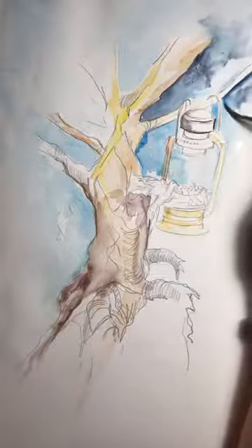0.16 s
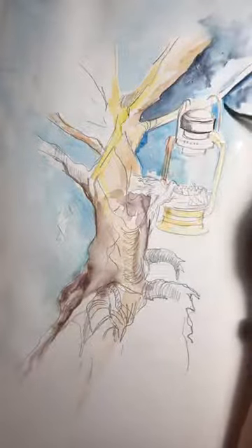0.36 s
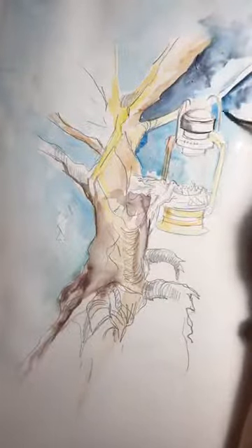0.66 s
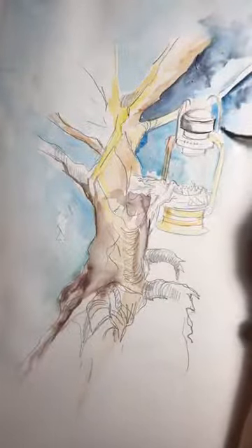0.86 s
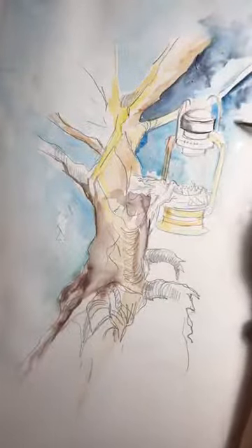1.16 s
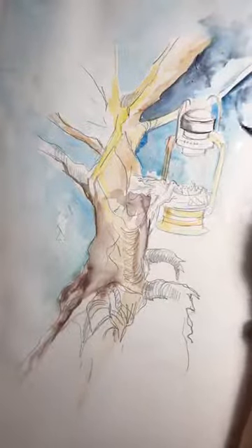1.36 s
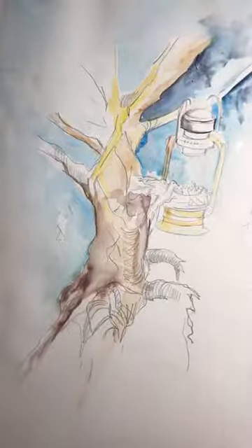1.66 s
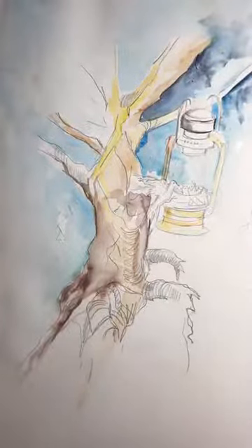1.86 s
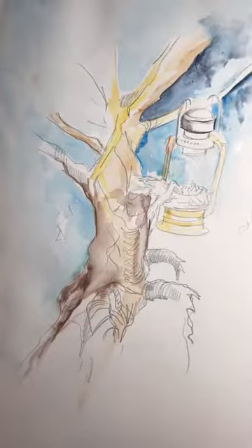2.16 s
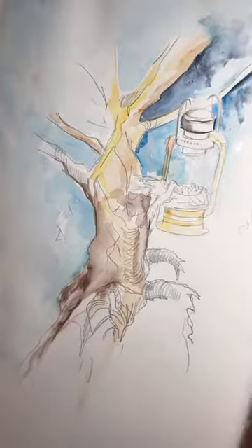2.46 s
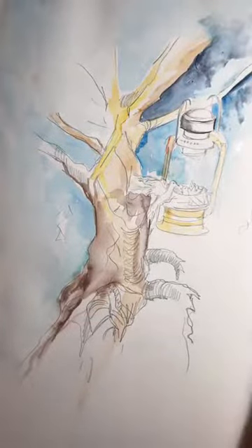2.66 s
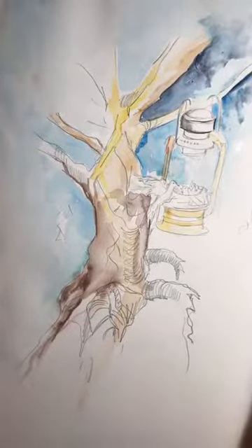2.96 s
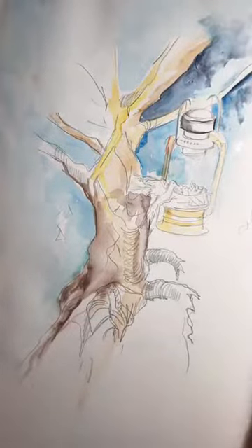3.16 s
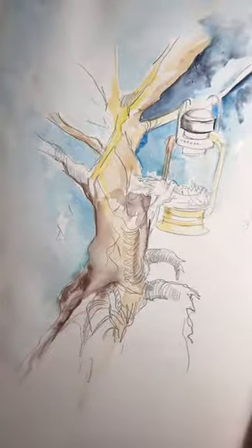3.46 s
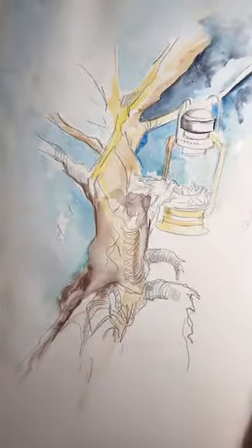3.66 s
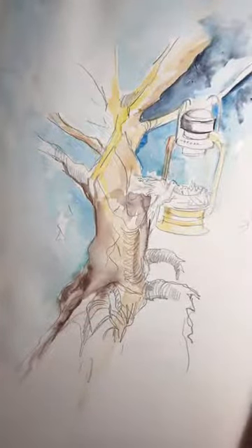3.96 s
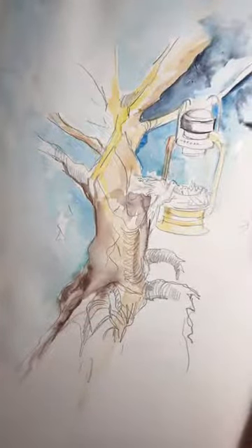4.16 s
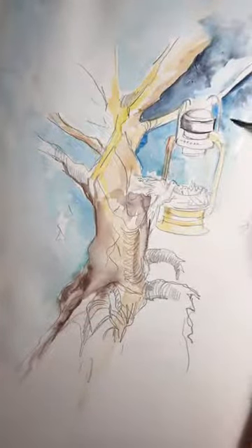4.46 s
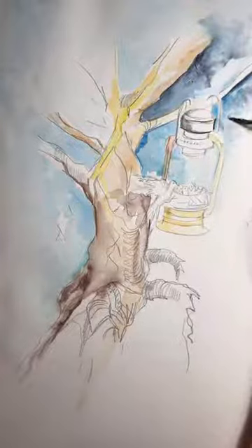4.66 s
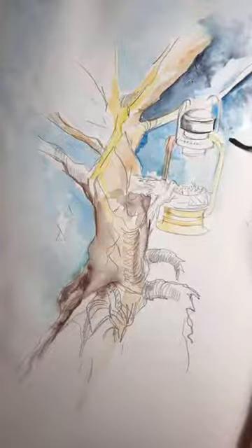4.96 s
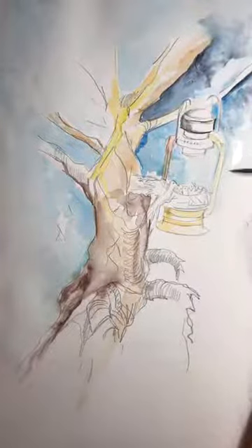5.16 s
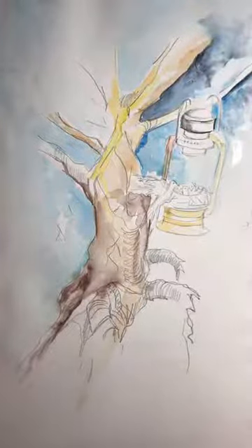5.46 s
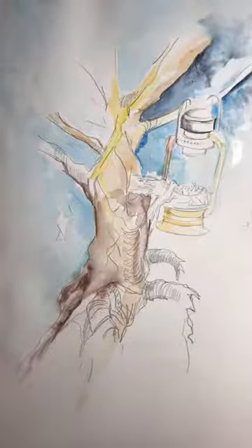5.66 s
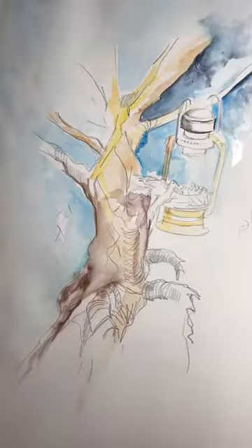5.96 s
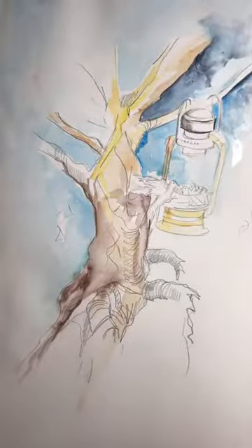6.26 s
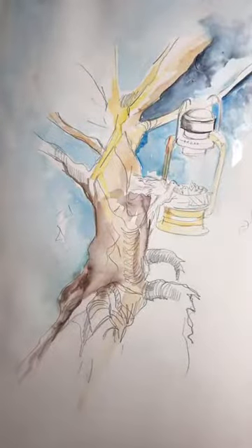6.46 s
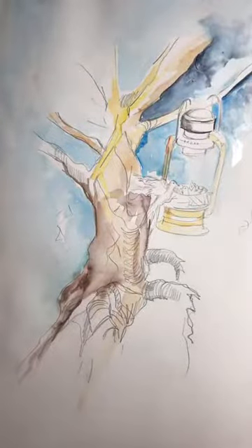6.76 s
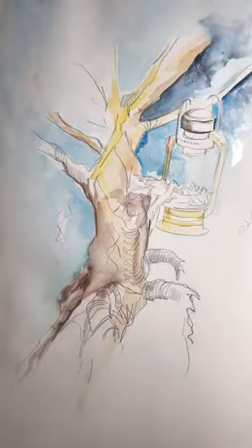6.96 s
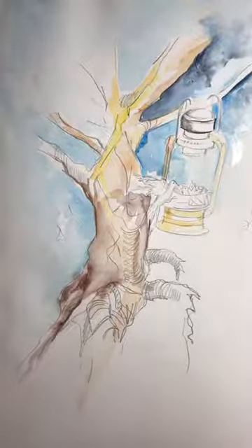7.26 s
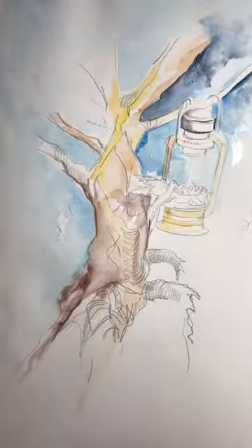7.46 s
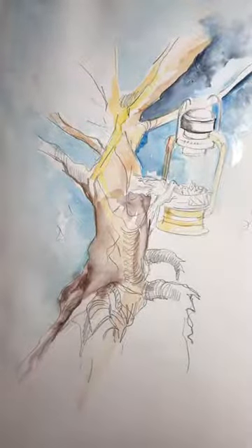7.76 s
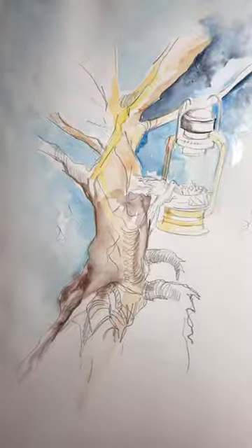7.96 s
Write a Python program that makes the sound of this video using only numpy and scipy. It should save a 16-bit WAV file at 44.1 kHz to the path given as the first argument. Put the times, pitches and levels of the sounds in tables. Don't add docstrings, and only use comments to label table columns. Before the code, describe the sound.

Soft bristle strokes over low room rumble give way to a paintbrush handle clinking hard against a glass water jar, then a quiet cloth rub.

```python
import sys
import numpy as np
from scipy import signal
from scipy.fft import rfft, irfft, next_fast_len
from scipy.io import wavfile

SR = 44100
rng = np.random.default_rng(int(sys.argv[2]) if len(sys.argv) > 2 else 0)


def file_out(sig):
    cols = np.atleast_2d(sig).T
    lim = np.clip(cols, -1, 1)
    pcm = np.round(lim * 32767).astype(np.int16)
    wavfile.write(sys.argv[1], SR, pcm)


N = 357651

# frequency in [Hz], density in [dB per Hz].
AIR_SPECTRUM = [(11, -64), (18, -10.5), (59, -3), (196, -15.5), (300, -15), (446, -24.5), (576, -20.5),
                (744, -24), (1170, -27.5), (2670, -28.5), (3260, -31.5), (6820, -35.5), (10400, -40),
                (13900, -38.5), (16000, -41)]
# centre in [Hz], width in [Hz], level in [dB].
FAN_BANDS = [(52.13, 20.2, -56), (292.8, 10.5, -70.5), (591, 29, -77.5), (2155, 164, -78.5),
             (2649, 47, -78), (3684, 60, -86), (6030, 330, -82), (6710, 420, -81.5)]
# start in [s], length in [s], level in [dB].
FAR_TONES = [
    (0.0, 0.04, -67.5),
    (.5, 0.34, -72.5),
    (3.75, .1, -99),
    (4.713, 0.11, -71.5),
    (5.09, 1.3, -77.5),
    (7.0, .4, -81),
    (7.7, 0.029, -71),
]
# frequency in [Hz], t60 in [s].
ROOM_T60 = [(300, 0.32), (2500, 0.38), (8000, 0.35), (15000, 0.38)]

# start in [s], length in [s], level in [dB].
SLEEVE_DRAGS = [
    (7.436, 0.085, -67),
    (7.548, 0.16, -63.5),
    (7.804, 0.0086, -64),
    (7.922, 0.083, -51),
    (8.07, 0.028, -48),
]
# frequency in [Hz], density in [dB per Hz].
SLEEVE_SPECTRUM = [(41, -44), (70, -5), (75, -23), (113, -1.5), (212, -4), (461, -11), (504, -12),
                   (744, -20), (1330, -15), (2500, -40), (3250, -61), (5500, -120)]
# start in [s], level in [dB].
ROCKS = [
    (5.598, -39.5),
    (6.28, -46),
    (6.45, -48.5),
    (6.518, -53.5),
    (6.798, -46),
    (6.84, -58),
]
# frequency in [Hz], density in [dB per Hz].
ROCK_SPECTRUM = [(41, -51.5), (70, -7), (135, -5.5), (207, -11), (309, -13), (407, -11), (548, -25),
                 (624, -16.5), (1200, -28), (1560, -39), (2640, -120)]

# start in [s], paper, wet dab and dry hiss levels in [dB].
DABS = [(.02, -67, -70.5, -72), (.48, -69.5, -76, -82), (.718, -67, -77, -74), (.945, -65.5, -70, -74),
        (1.022, -80, -76, -80), (1.102, -74, -74, -86), (1.26, -65.5, -69, -72), (1.47, -65, -68, -60),
        (2.64, -70, -59.5, -62), (2.87, -68, -68.5, -76), (3.031, -74, -62, -64.5),
        (3.252, -68.5, -60.5, -62.5), (3.487, -63.5, -62.5, -65.5), (3.724, -59, -57.5, -64.5),
        (4.0, -61.5, -64, -71.5), (4.265, -62, -68, -71.5), (4.43, -67.5, -71, -76),
        (4.49, -70.5, -71, -76), (4.62, -64.5, -71, -73), (7.048, -71, -82, -72),
        (7.512, -82, -64.5, -60.5), (7.635, -57.5, -62.5, -57.5), (7.928, -71, -62, -55),
        (8.072, -83, -73, -61)]
# start in [s], length in [s], paper, wet dab, dry hiss in [dB].
STROKES = [(1.37, 0.12, -73, -80, -66.5), (1.574, 0.25, -72, -78, -75), (2.358, 0.039, -78, -96, -71),
           (2.778, 0.066, -73, -72, -67), (2.543, 0.63, -78, -83, -75.5), (3.813, .15, -82, -84, -88),
           (5.037, 0.04, -64.5, -56, -63), (5.137, 0.11, -72, -72, -63.5), (5.306, 0.24, -74.5, -97, -79),
           (7.093, .14, -103, -92, -72), (7.436, 0.18, -65.5, -70, -59.5), (7.715, 0.2, -80, -77, -69.5),
           (7.995, .14, -72, -71, -64.5)]
# frequency in [Hz], density in [dB per Hz].
PAPER_SPECTRUM = [(530, -64), (900, -4), (1090, -6.5), (1300, -6), (1470, -15), (1600, -11.5), (1900, -1),
                  (2160, -3), (2620, -4), (2800, -7), (3640, -20), (6160, -120)]
# frequency in [Hz], density in [dB per Hz].
WET_SPECTRUM = [(1530, -34), (2600, 0), (2820, 1), (4100, 3), (4520, -10.5), (4910, 1), (5280, -3.5),
                (6500, -7), (8450, -7), (14300, -120)]
# frequency in [Hz], density in [dB per Hz].
HISS_SPECTRUM = [(2350, -10), (4000, -9), (5410, -5), (6110, 3.5), (13000, 1), (15100, 1.5), (16000, -11)]
# centre in [Hz], width in [Hz], level in [dB].
PALETTE_MODES = [(1980, 26, -3), (3870, 14, -9), (4442, 75, 2), (5300, 64, -2.5), (6200, 19, -10)]

# start in [s], middle, low and top mode levels in [dB], contact in [ms].
TICKS = [(1.3618, -58, -60, -68, 0.93), (2.0271, -63, -62, -50, 1.5), (2.4458, -31, -41.5, -42, 1.4),
         (2.4504, -36.5, -48, -75, 0.93), (3.7204, -59, -56, -67, 0.65), (5.19, -53, -70, -68, .4),
         (5.3328, -57, -70, -66, 1.2), (5.789, -69, -60, -66, 1.3), (6.042, -60, -70, -74, 1.5),
         (7.2502, -36, -43, -51, 1.8), (7.2962, -66, -51, -63, 2.6), (7.3012, -58, -52.5, -62, .74)]
# start in [s], middle, low clack and top mode levels in [dB], contact in [ms].
KNOCKS = [(6.0729, -26, -24.5, -46, 1.8), (6.095, -38, -39.5, -57, 2.8), (6.1177, -33.5, -45, -64.5, 1.6),
          (6.2633, -20, -31, -40, 0.57), (6.2671, -27.5, -23.5, -45.5, 1.7), (6.2723, -24, -37, -51, 1.7),
          (6.279, -46, -30.5, -40, 0.8), (6.2833, -18.5, -44, -34, 1.2), (6.2896, -34.5, -51.5, -31.5, 3.5),
          (6.4375, -9.5, -37, -17.5, 1.3), (6.4405, -29, -39.5, -17.5, 1.3)]
# start in [s], middle, low clack and top levels in [dB], contact in [ms].
RATTLE = [(5.5832, -13, -26, -26.5, 1), (5.5863, -16.5, -33, -26, 1.8), (5.5908, -23.5, -20.5, -30, 1.8),
          (5.5973, -39, -38, -28, 7.4), (5.6074, -16.5, -28, -27, 1), (5.6113, -29, -33, -29.5, 2.8),
          (5.616, -41, -53, -27, 3.1), (5.6224, -29, -33, -35, 7.6), (5.6326, -49, -49, -27.5, 5.2),
          (5.6373, -36, -53, -33, 1.3), (5.6433, -46, -30, -35.5, 2.4), (5.6519, -42, -37, -43, 1.5)]
# start in [s], ferrule, low clack and top levels in [dB], contact in [ms].
SET_DOWN = [
    (6.7876, -15.5, -51.5, -64, 2.6),
    (6.791, -34, -63, -29.5, 2.3),
    (6.7983, -50, -60, -36.5, 0.88),
    (6.811, -50, -56, -52, 1.3),
]
# start in [s], pitch in [Hz], level in [dB], t60 in [s].
DRIP = (6.049, 3330, -50, .08)
# start in [s], level in [dB], pitch in [Hz], t60 in [s], twin mode level in [dB].
RINGS = [
    (5.581, -40, 2610, 0.36, -8),
    (5.609, -34, 2604, 0.18, -13),
    (5.655, -35, 2558, 0.14, -19),
    (6.075, -34.5, 2600, 0.035, -2.5),
    (6.098, -48, 2600, .087, -12),
    (6.12, -47.5, 2600, 0.15, -4),
    (6.266, -27, 2600, 0.12, -19),
    (6.292, -37.5, 2595, 0.18, -2),
    (6.441, -27, 2590, 0.19, -6),
    (6.793, -49.5, 2560, 0.19, -14),
]

# frequency in [Hz], level in [dB], t60 in [s].
JAR_LOW = [(1790, 7.5, 0.00073), (2600, 0, 0.007)]
# frequency in [Hz], level in [dB], t60 in [s].
JAR_MIDDLE = [(3400, -25.5, .02), (4150, -10, 0.0088), (4770, -12.5, 0.029), (4860, -4, .003),
              (5260, -16, 0.013), (5930, 0, 0.0048), (6440, -8, 0.02), (7640, -3, 0.0013)]
# frequency in [Hz], level in [dB], t60 in [s].
JAR_TOP = [(8900, 2, 0.0019), (9700, -13, .008), (10100, -4, 0.022), (10500, 2, .002), (12140, -13, .02),
           (12600, -1.5, 0.0015), (13600, -18, .008), (13800, -4.5, 0.017), (14000, -16, .018),
           (14850, -10, .02), (14500, 7, 0.0016)]
# frequency in [Hz], level in [dB], t60 in [s].
TABLE_MODES = [(73, -26, 0.1), (125, 1, 0.25), (186, -6, 0.076), (305, 0.5, 0.12), (574, 3, 0.027),
               (805, 5, 0.024), (958, -6, 0.049), (1274, -11.5, 0.071), (1795, -1.5, 0.0071)]
# frequency in [Hz], level in [dB], t60 in [s].
HANDLE_LOW = [(1090, 4.5, 0.0055), (1900, 3, 0.014), (2400, 4.5, 0.0047)]
# frequency in [Hz], level in [dB], t60 in [s].
HANDLE_MIDDLE = [(4100, -1.6, 0.0019), (5770, -1.4, 0.00093), (7130, -1.1, 0.0046), (8100, 0.29, 0.0059)]
# frequency in [Hz], level in [dB], t60 in [s].
HANDLE_TOP = [(8700, 3.26, 0.0011), (9900, 1.7, 0.0017), (12600, 0.9, 0.0011), (14100, 2.3, 0.002)]
# frequency in [Hz], level in [dB], t60 in [s].
FERRULE_MODES = [(4160, -31, .004), (5840, -18, 0.0044), (6500, 0, 0.0046), (7500, -9, 0.0044)]


def from_db(db):
    return 10 ** (np.asarray(db) / 20)


def rms_one(x):
    return x / np.sqrt(np.mean(x ** 2) + 1e-20)


def at_hz(points, hz):
    table_hz, value = np.array(points).T
    return np.interp(np.log(hz), np.log(table_hz), value)


def width_to_t60(width_hz):
    return np.log(1000) / (np.pi * width_hz)


def drift(rate_hz):
    pole = np.exp(-80 * np.pi * rate_hz / SR)
    noise = rng.standard_normal(N // 40 + 2002)
    slow = signal.lfilter([1], [1, -2 * pole, pole ** 2], noise)[2000:]
    return np.interp(np.arange(N) / 40, np.arange(len(slow)), rms_one(slow))


def ring(force, hz, t60_s):
    pole = from_db(-60 / (t60_s * SR))
    turn = 2 * np.pi * hz / SR
    return signal.lfilter([0, np.sin(turn)], [1, -2 * pole * np.cos(turn), pole ** 2], force + 1e-18)


def coloured(spectrum):
    length = next_fast_len(N)
    hz = np.fft.rfftfreq(length, 1 / SR) + 1
    bins = rfft(rng.standard_normal(length)) * from_db(at_hz(spectrum, hz))
    return rms_one(irfft(bins, length)[:N])


def narrow(hz, width_hz):
    t60_s = width_to_t60(width_hz)
    once = ring(rng.standard_normal(N + SR), hz, t60_s)
    return rms_one(ring(once, hz, t60_s)[SR:])


def held(start_s, length_s, rise_db_per_s, fall_db_per_s):
    t = np.arange(N) / SR
    rise_db = np.minimum(rise_db_per_s * (t - start_s), 0)
    fall_db = fall_db_per_s * np.maximum(t - start_s - length_s, 0)
    return from_db(rise_db - fall_db)


def struck(events, bodies, trims_db, spread_db):
    crack_db, crack_above_hz = 0.5, 3200
    thump_follows = 0.52
    out, span = np.zeros(N), SR // 6
    bare = signal.butter(2, crack_above_hz, "high", fs=SR, output="sos")
    for start_s, *levels_db, contact_ms in events:
        at = round(start_s * SR)
        age = np.arange(span) / SR / (max(contact_ms, 0.1) / 1000)
        grit = rng.standard_normal(span) * from_db(7 * rng.standard_normal(span))
        force = grit * np.sqrt(age) * np.exp(-age)
        force /= np.sqrt(np.sum(force ** 2))
        crack_gain = 4 * from_db(levels_db[-1] + trims_db[-2] + crack_db)
        out[at:at + span] += crack_gain * signal.sosfilt(bare, force)
        body_levels_db = levels_db + [thump_follows * levels_db[0]]
        for body, level_db, trim_db in zip(bodies, body_levels_db, trims_db):
            rings = np.zeros(span)
            for hz, mode_db, t60_s in body:
                mode_gain = from_db(mode_db + spread_db * rng.standard_normal())
                rings += mode_gain * ring(force, hz, t60_s)
            radiates = signal.butter(3, 0.75 * body[0][0], "high", fs=SR, output="sos")
            out[at:at + span] += from_db(level_db + trim_db) * signal.sosfilt(radiates, rings)
    return out


def room_tone():
    air = from_db(-60.5 + 0.62 * drift(7.6)) * coloured(AIR_SPECTRUM)
    whine = sum(from_db(level_db) * narrow(hz, width_hz) for hz, width_hz, level_db in FAN_BANDS)
    far_gain = sum(from_db(level_db) * held(start_s, length_s, rise_db_per_s=53, fall_db_per_s=46.5)
                   for start_s, length_s, level_db in FAR_TONES)
    return air + whine + far_gain * narrow(777, width_hz=16)


def room(x):
    room_db, first_echo_s = -9.5, 0.0034
    t = np.arange(SR // 2) / SR
    edges_hz = 70 * 2.0 ** np.arange(9)
    tail = np.zeros(len(t))
    for low_hz, high_hz in zip(edges_hz, edges_hz[1:]):
        band = signal.butter(2, [low_hz, min(high_hz, 0.45 * SR)], "band", fs=SR, output="sos")
        t60_s = at_hz(ROOM_T60, low_hz * np.sqrt(2))
        tail += signal.sosfilt(band, rng.standard_normal(len(t))) * from_db(-60 * t / t60_s)
    tail *= t > first_echo_s
    tail /= np.sqrt(np.sum(tail ** 2))
    return from_db(room_db) * signal.fftconvolve(x, tail)[:N]


def sleeve():
    level = sum(from_db(level_db) * held(start_s, length_s, rise_db_per_s=807, fall_db_per_s=256)
                for start_s, length_s, level_db in SLEEVE_DRAGS)
    return level * from_db(2.5 * drift(37)) * coloured(SLEEVE_SPECTRUM)


def rocking():
    rise_db_per_s, settle_db = 2998, -20.5
    level = np.zeros(N)
    for start_s, level_db in ROCKS:
        jolt = held(start_s, 0, rise_db_per_s, fall_db_per_s=366)
        settling = held(start_s, 0, rise_db_per_s, fall_db_per_s=62)
        level += from_db(level_db) * (jolt + from_db(settle_db) * settling)
    return level * from_db(3.5 * drift(21)) * coloured(ROCK_SPECTRUM)


def slips():
    slips_per_s, spread_db = 900, 4.0
    sizes = from_db(spread_db * np.minimum(rng.exponential(1, N), 4)) * rng.choice([-1, 1], N)
    clicks = sizes * (rng.random(N) < slips_per_s / SR)
    return rms_one(sum(from_db(level_db) * np.sqrt(width_hz) * ring(clicks, hz, width_to_t60(width_hz))
                       for hz, width_hz, level_db in PALETTE_MODES))


def brush():
    flutter = from_db(1.2 * drift(55))
    gains = np.zeros((3, N))
    for start_s, *levels_db in DABS:
        gains += np.outer(from_db(levels_db), held(start_s, 0.017, rise_db_per_s=700, fall_db_per_s=272))
    for start_s, length_s, *levels_db in STROKES:
        gains += np.outer(from_db(levels_db), held(start_s, length_s, rise_db_per_s=450, fall_db_per_s=404))
    paper_gain, wet_gain, hiss_gain = gains
    paper = paper_gain * coloured(PAPER_SPECTRUM)
    wet = wet_gain * (0.82 * coloured(WET_SPECTRUM) + from_db(-6.5) * slips())
    hiss = hiss_gain * coloured(HISS_SPECTRUM)
    return flutter * (paper + wet + hiss)


def handle():
    bodies = (HANDLE_MIDDLE, HANDLE_LOW, HANDLE_TOP, TABLE_MODES)
    return struck(TICKS, bodies, (-0.5, -2, 7.5, -72), spread_db=1.0)


def bell():
    twin_below_hz, swell_s = 22, 0.0025
    out, t = np.zeros(N), np.arange(SR // 2) / SR
    swell = 1 - np.exp(-(t / swell_s) ** 2)
    for start_s, level_db, hz, t60_s, twin_db in RINGS:
        at = round(start_s * SR)
        main = np.sin(2 * np.pi * hz * t)
        twin = from_db(twin_db) * np.sin(2 * np.pi * (hz - twin_below_hz) * t)
        out[at:at + len(t)] += from_db(level_db - 60 * t / t60_s) * swell * (main + twin)
    return out


def drip():
    start_s, hz, level_db, t60_s = DRIP
    click = np.zeros(N)
    click[round(start_s * SR)] = from_db(level_db)
    return ring(click, hz, t60_s)


def jar():
    knocks = struck(KNOCKS, (JAR_MIDDLE, JAR_LOW, JAR_TOP, TABLE_MODES),
                    (-6, -2.7, -0.5, -45.5), spread_db=5.5)
    rattle = struck(RATTLE, (JAR_MIDDLE, JAR_LOW, HANDLE_TOP, TABLE_MODES),
                    (-4.5, -0.5, 5.0, -39.5), spread_db=2.5)
    set_down = struck(SET_DOWN, (FERRULE_MODES, JAR_LOW, HANDLE_TOP, TABLE_MODES),
                      (-3.5, 5.5, 6.5, -39), spread_db=3.5)
    return knocks + rattle + set_down + drip()


def scene():
    hits, note = jar() + handle(), bell()
    echoes = room(hits + from_db(0.5) * note)
    mix = room_tone() + sleeve() + rocking() + brush() + echoes + note + hits
    return mix[None]


def band_limit(x):
    return signal.sosfilt(signal.butter(12, 16960, fs=SR, output="sos"), x)


def record(dry):
    stop_hz, stop_db = 16200, 45
    top_cut = signal.cheby2(10, stop_db, stop_hz, fs=SR, output="sos")
    mix = signal.sosfilt(top_cut, dry)
    return band_limit(mix)


dry = scene()
out = record(dry)
file_out(out)
```